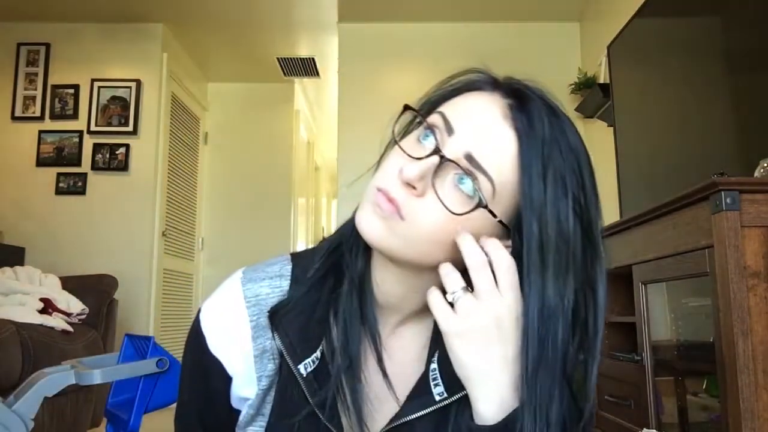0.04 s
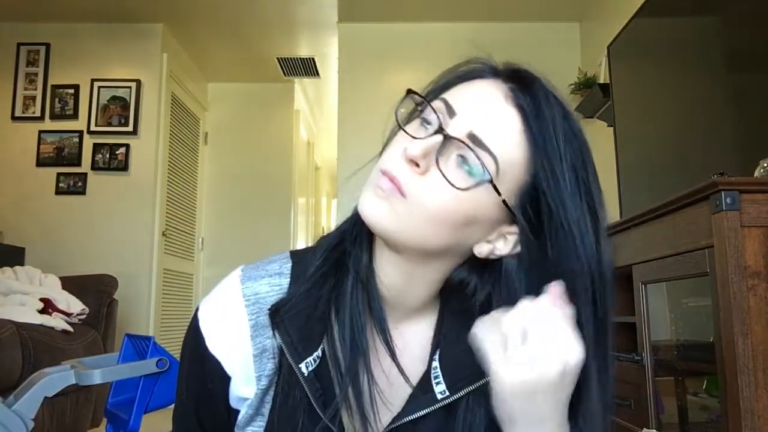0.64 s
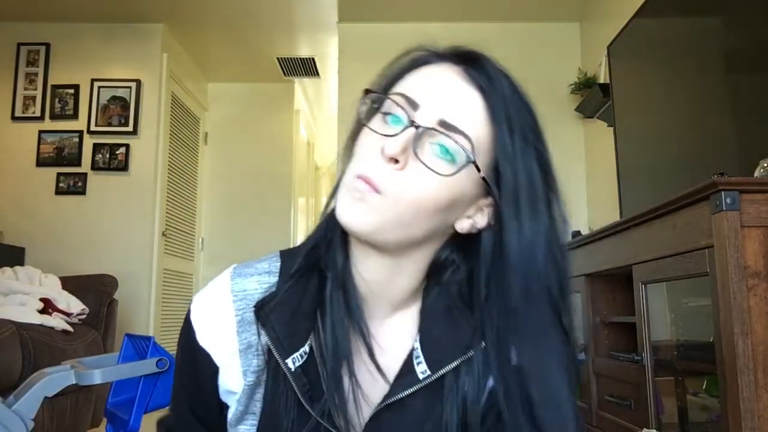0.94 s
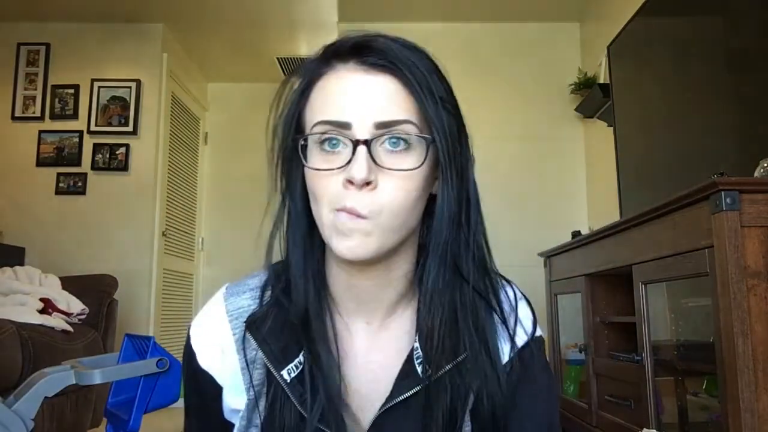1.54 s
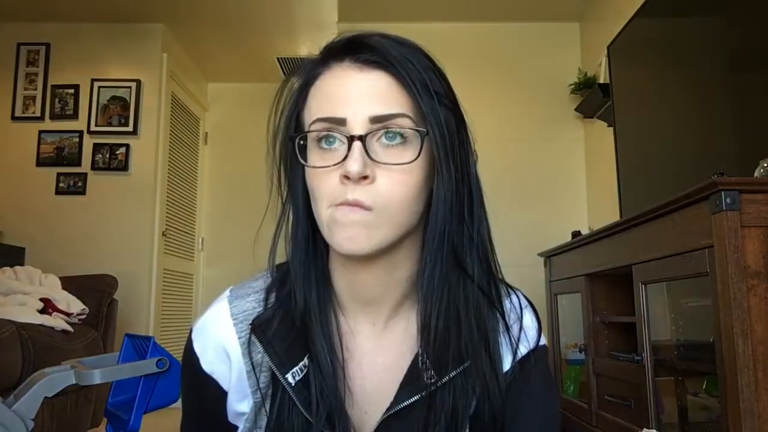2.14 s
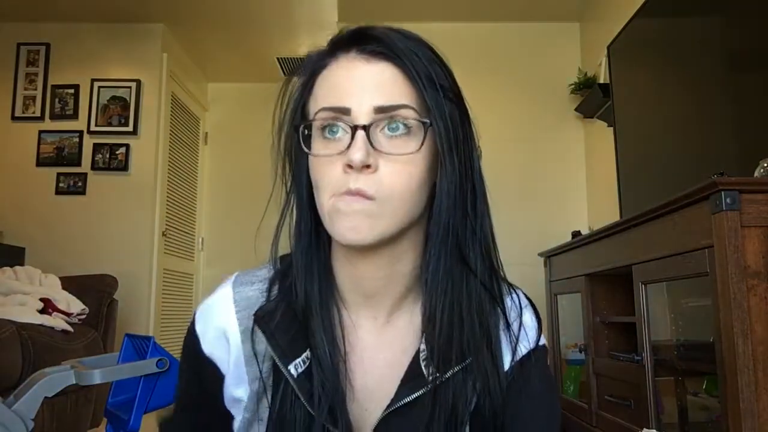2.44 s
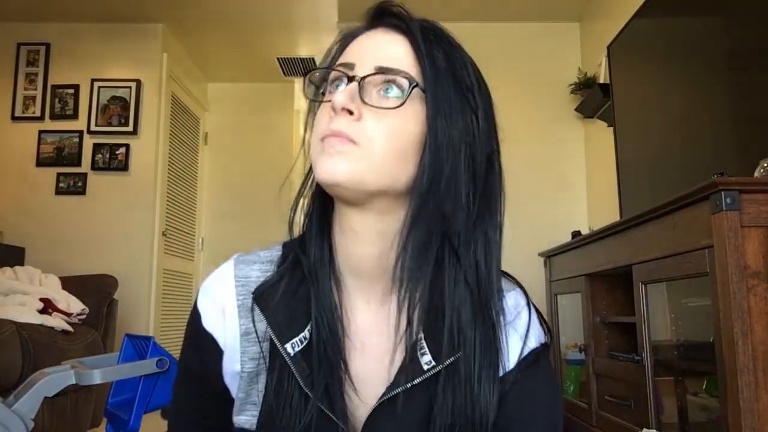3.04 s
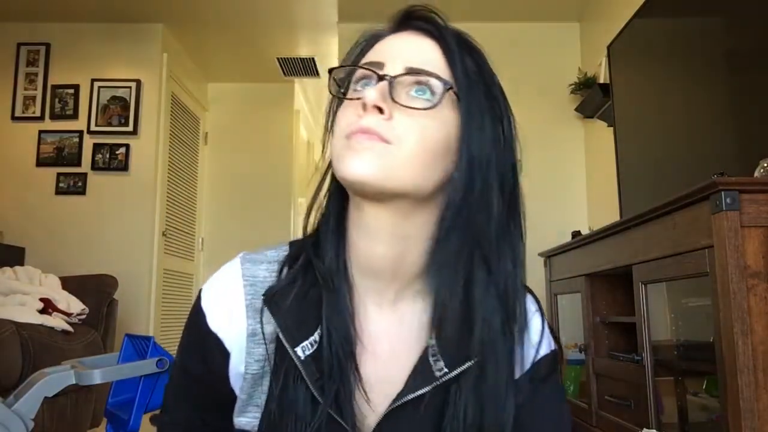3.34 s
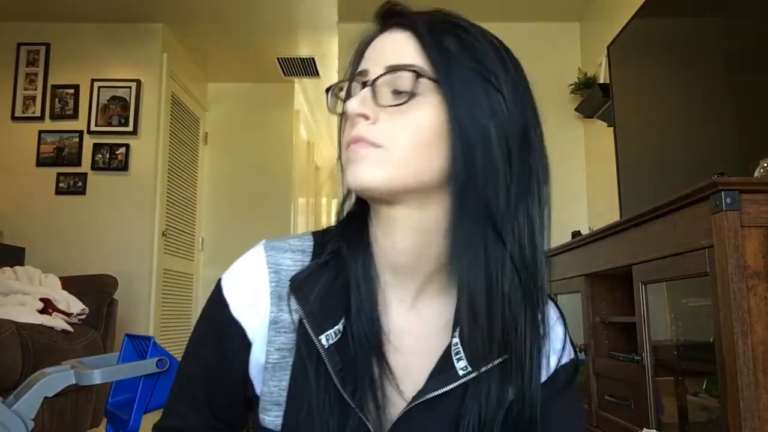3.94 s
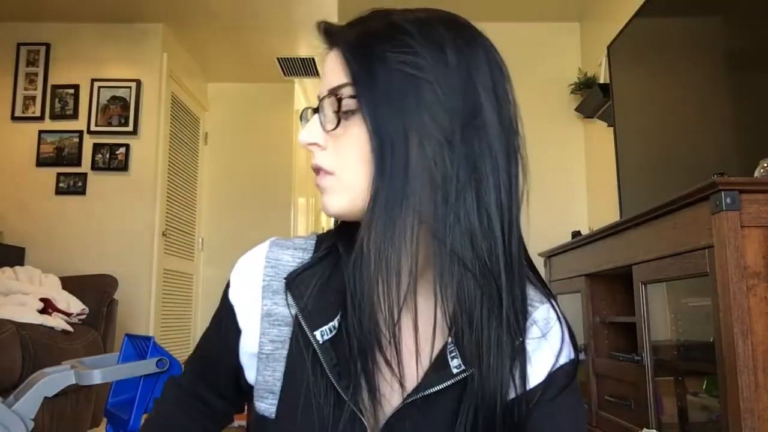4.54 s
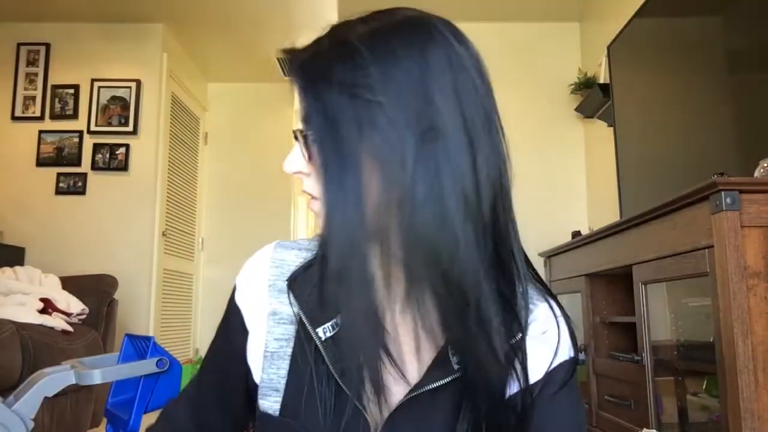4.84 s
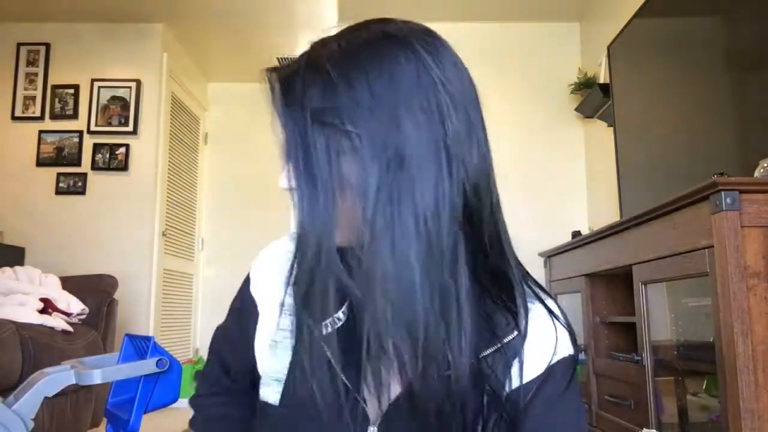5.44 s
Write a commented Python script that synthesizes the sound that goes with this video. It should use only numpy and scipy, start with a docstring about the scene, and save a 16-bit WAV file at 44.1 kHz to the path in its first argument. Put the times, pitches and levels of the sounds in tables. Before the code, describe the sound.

From the start, jets passing over a house fill a living room with a low, muffled roar. It booms and wavers, with brief hollow swells and a slightly raspier edge at the opening and again from about 1.8 to 3 seconds. Close to the microphone, clothes and hair brush very softly from around 1 second, and a cluster of faint, crisp ticks crackles at 1.2 to 1.3 seconds. A few barely audible brushes follow under the rumble. From about 3.7 seconds the roar grows quieter and duller as the jets draw away, though the deep rumble carries on. A second, longer cluster of small ticks and soft rustling runs from 3.9 to 4.4 seconds, with one more faint tick at 4.7. At about 5.3 seconds all sound cuts off abruptly.

```python
"""Jets passing over a living room

Jets pass over a house and draw away. Their exhaust roar, dulled by the walls, booms at the pitches the
room favours and swells and fades with the churning air. Close by, someone moves: clothes brush, and
faint ticks crackle, mostly in two clusters. The sound stops dead when the recorder is switched off."""
import sys
import numpy as np
from scipy import signal
from scipy.fft import rfft, irfft
from scipy.io import wavfile
from scipy.ndimage import uniform_filter1d

SR = 44100
rng = np.random.default_rng(int(sys.argv[2]) if len(sys.argv) > 2 else 0)


def wav_out(sig):
    """Save sig, one row per channel (or a flat mono array), as 16-bit PCM at SR to the path in sys.argv[1]."""
    wavfile.write(sys.argv[1], SR, np.round(np.clip(np.atleast_2d(sig).T, -1, 1) * 32767).astype(np.int16))


N = 247160
TIME = np.arange(N) / SR
FREQ = np.maximum(np.fft.rfftfreq(N, 1 / SR), 1)

# pitches at which the room and window panes ring: (pitch [Hz], width [Hz], lift [dB])
ROOM_MODES = [(85.7, 9, 15.5), (133.4, 9.2, 3.5), (155, 11, 10), (254.7, 7.4, 9.5), (281.9, 4.4, 8.5),
              (312.6, 13, 6.5), (346.8, 7.1, 9), (456.7, 12, 6.5), (609.6, 30, 4), (804, 42, 5.5),
              (1006, 29, 2.5), (1077, 120, 3.5), (1190, 11, 2), (1367, 50, 6)]
# pitches that cancel out where the microphone stands: (pitch [Hz], width [Hz], dip [dB])
ROOM_NODES = [(108, 14, -3.5), (177, 35, -6), (330, 24, -5.5), (497, 21, -5.5), (863, 110, -5.5)]
# the tone of a tick's snap: (pitch [Hz], relative level [dB])
SNAP = [(500, -8), (1500, 9.5), (2500, 3.5), (3700, -0.5), (5700, -1.5), (7500, -7.5), (9300, -7.5),
        (11600, -10), (15000, -19.5)]


def undb(db):
    """Turn decibels into a number to multiply by (a gain)."""
    return 10 ** (np.asarray(db) / 20)


def curve(table):
    """Join (time, level) points with straight lines, giving one level per sample."""
    times, levels = np.transpose(table)
    return np.interp(TIME, times, levels)


def colour(points, freq=FREQ):
    """Join (pitch, level) points into a gain for each frequency."""
    hz, db = np.transpose(points)
    return undb(np.interp(np.log(freq), np.log(hz), db))


def resonances(table):
    """Turn (pitch, width, height) peaks and dips into a gain for each frequency."""
    return undb(sum(db / (1 + (2 * (FREQ - hz) / width) ** 2) for hz, width, db in table))


def noise(gain):
    """Noise shaped by a gain for each frequency, scaled to an average strength (rms) of 1."""
    shaped = irfft(rfft(rng.standard_normal(N)) * gain, N)
    return shaped / np.sqrt(np.mean(shaped ** 2))


def walk(rate):
    """A smooth random wobble of typical size 1, up to about `rate` swings a second."""
    return noise(np.exp(-(FREQ / rate) ** 2))


def steady(x, span_s):
    """Even out the slow swells of a noise, leaving its fast grain."""
    local_power = uniform_filter1d(x ** 2, max(int(span_s * SR), 2))
    return x / np.sqrt(local_power + 1e-9)


def swell(peak_s, rise_s, fall_s):
    """A smooth bump of height 1 that tops out at peak_s."""
    return np.exp(-((TIME - peak_s) / np.where(TIME < peak_s, rise_s, fall_s)) ** 2)


def jet_band_levels(recede_s=3.82, rasp_sink_db_per_s=3.5, rush_sink_db_per_s=0.47):
    """Levels in dB of the jets' eight bands, low to high; the treble sinks with distance."""
    # the deepest rumble: (time [s], level [dB])
    rumble = [(0, -44.5), (.22, -37), (.55, -43.5), (1.35, -47), (1.95, -42.5), (2.12, -39), (2.75, -38.5),
              (3.3, -47), (4.0, -38), (4.65, -40.5), (5.33, -44.5)]
    # the boom around the room's lowest ringing pitch: (time [s], level [dB])
    boom = [(0, -28.5), (.24, -25.5), (.38, -32), (.6, -35.5), (.81, -26.5), (.95, -36.5), (1.5, -38),
            (1.85, -27.5), (2.25, -33.5), (2.53, -24.5), (2.63, -37), (2.92, -38.5), (3.12, -32),
            (3.5, -27), (3.75, -32.5), (3.86, -28), (4.0, -37), (4.42, -41), (4.85, -46.5), (5.26, -33)]
    # the drone an octave above it: (time [s], level [dB])
    drone = [(0, -29), (.07, -25.5), (.35, -38), (.57, -30), (.8, -40.5), (1.08, -31), (1.2, -35),
             (1.42, -29), (1.7, -27.5), (1.93, -25.5), (2.03, -32.5), (2.2, -30), (2.9, -32), (3.35, -33.5),
             (3.56, -28.5), (3.78, -35), (4.16, -41), (4.3, -30.5), (4.5, -34), (4.73, -27.5), (4.84, -33),
             (4.98, -26), (5.13, -38.5), (5.33, -31)]
    # the low roar, which thins out and fills in on its own: (time [s], level [dB])
    low_roar = [(0, -56), (.2, -49), (.42, -32.5), (1.0, -42.5), (1.4, -45.5), (1.7, -31.5), (2.05, -34.5),
                (3.45, -36.5), (3.78, -43), (4.25, -43.5), (4.7, -40.5), (4.97, -50.5), (5.33, -41)]
    # the exhaust roar indoors, which the top four bands follow: (time [s], level [dB])
    roar = [(0, -26), (.15, -29), (.35, -32.5), (.6, -30.5), (1.0, -34), (1.35, -30.5), (1.95, -29.5),
            (2.15, -35.5), (2.5, -28), (2.85, -29.5), (3.1, -31), (3.42, -30), (3.62, -34), (4.42, -42),
            (4.62, -42), (5.05, -39.5), (5.33, -39.5)]
    # surges of rasp through the churning air: (time [s], lift [dB], fall time [s])
    surges = [(.03, 3, 0.52), (1.82, 4, 0.33), (2.618, 3.5, 0.089), (2.82, 2.5, 0.1)]
    roar_db, usual_db = curve(roar), -26
    excess_db = roar_db - usual_db
    surge_db = sum(db * swell(s, rise_s=0.02, fall_s=fall_s) for s, db, fall_s in surges)
    harshness_db = surge_db - rasp_sink_db_per_s * np.maximum(TIME - recede_s, 0)
    middle = roar_db - 1.9  # this band's part of the whole roar
    upper = -36 + 0.48 * excess_db + harshness_db / 2
    rasp = -40 + 0.22 * excess_db + harshness_db
    # the air takes the highest part away first, right from the start
    rush = -54.5 + 0.25 * excess_db + surge_db / 2 - rush_sink_db_per_s * TIME
    return [curve(rumble), curve(boom), curve(drone), curve(low_roar), middle, upper, rasp, rush]


def ground_echo(x, share=0.43, lag_s=0.009, drift_s=0.001777, drift_rate=1.598):
    """Add a bounce off the ground; its delay wanders, so narrow swells drift through the roar."""
    position = (TIME - lag_s - drift_s * walk(drift_rate)) * SR
    return x + share * np.interp(position % N, np.arange(N), x)


def jets(top_flutter_db=0.8, flutter_rate=14):
    """Exhaust noise booms in the room; churning air on the way makes its upper parts flutter."""
    # borders between rumble, boom, drone, low, middle and upper roar, rasp and rush: (pitch [Hz])
    edges_hz = [66, 108, 176, 240, 400, 720, 1600]
    # exhaust noise after air, roof and windows: (pitch [Hz], relative level [dB])
    through_walls = [(25, -45.5), (45, -15), (68, -10), (130, -2), (200, -6), (310, -12), (500, -13.5),
                     (800, -16.5), (1200, -25.5), (1600, -31), (2100, -42.5), (2850, -51), (3400, -70.5),
                     (8000, -104)]
    indoor_tone = colour(through_walls) * resonances(ROOM_MODES + ROOM_NODES)
    below_edge = [1 / (1 + (FREQ / hz) ** 20) for hz in edges_hz]
    # each band takes what lies between two neighbouring borders
    shares = np.abs(np.diff([np.zeros_like(FREQ), *below_edge, np.ones_like(FREQ)], axis=0))
    gust_db = 0.18 * walk(rate=23)
    out = 0
    for k, (share, level_db) in enumerate(zip(shares, jet_band_levels())):
        band = noise(indoor_tone * np.sqrt(share))
        if k > 3:  # only the four upper bands get the drifting ground echo
            band = ground_echo(band)
        band = steady(band, span_s=0.13)
        # swirls of air scatter high pitches more than low ones
        flutter_db = k / len(edges_hz) * top_flutter_db * walk(flutter_rate)
        out = out + band * undb(level_db + flutter_db + gust_db)
    return out


def howls():
    """The roar turns hollow for a moment as a narrow band of exhaust noise rings in the room."""
    # hollow swells: (middle [s], length [s], pitch [Hz], width [Hz], peak level [dB])
    hollow_swells = [(0.1, 0.32, 334, 47, -29.5), (.19, 0.2, 348, 14, -37.5), (0.554, 0.1, 258, 12, -28.5),
                     (1.187, 0.34, 505, 70, -38), (1.267, 0.08, 790, 80, -37), (1.382, 0.28, 265, 25, -33),
                     (1.584, 0.069, 432, 45, -33), (1.917, 0.076, 464, 60, -33.5),
                     (1.997, 0.67, 1080, 140, -43), (2.637, 0.19, 860, 110, -38),
                     (2.79, 0.22, 283, 43, -30.5), (2.972, 0.09, 360, 18, -28.5),
                     (3.033, 0.072, 419, 24, -36), (3.168, 0.15, 833, 64, -42),
                     (3.186, .16, 306, 18, -31.5), (3.305, 0.093, 1720, 110, -54),
                     (3.362, 0.17, 227, 25, -34.5), (4.618, 0.23, 245, 26, -38),
                     (4.715, .14, 332, 45, -38.5), (5.037, 0.043, 505, 60, -40)]
    room_tone = resonances(ROOM_MODES + ROOM_NODES)
    out = 0
    for s, length, hz, width, db in hollow_swells:
        focus = np.exp(-((FREQ - hz) / width) ** 2)
        band = steady(noise(room_tone * focus), span_s=0.031)
        out = out + band * undb(db) * swell(s, length / 2, length / 2)
    return out


def tick(hz, tilt_db, fade_s, ring_db, ring_sharpness=6, pivot_hz=5500):
    """A short snap that rings at one pitch, scaled so its loudest millisecond has strength 1."""
    t = np.arange(4096) / SR
    freq = np.maximum(np.fft.rfftfreq(len(t), 1 / SR), 1)
    burst = rfft(rng.standard_normal(len(t)) * undb(-60 * t / fade_s))
    # a snap stirs all pitches about equally
    burst = burst / np.sqrt(uniform_filter1d(np.abs(burst) ** 2, size=110))
    ring = 1 + undb(ring_db) / (1 + 1j * ring_sharpness * (freq / hz - hz / freq))
    tilt = undb(tilt_db * np.log2(np.maximum(freq, 800) / pivot_hz))
    wave = irfft(burst * colour(SNAP, freq) * ring * tilt)[:len(t) // 2]
    return wave / np.sqrt(uniform_filter1d(wave ** 2, size=44).max())


def ticks(gain_db=-3, usual_fade_s=0.0098, usual_db=-40, doubling_db=21):
    """Faint ticks close by, each with its own size, pitch and sharpness; stronger ones last longer."""
    # ticks: (time [s], level before gain_db [dB], pitch [Hz], brightness [dB per octave], ring [dB])
    snaps = [(.22, -60, 5400, -3, 28), (0.897, -52.5, 7600, 1, 24), (1.174, -41, 3100, -2, 6),
             (1.177, -35.5, 3440, -3, 9), (1.1855, -38.5, 4300, 0.5, 0), (1.191, -32.5, 4340, -2, 4),
             (1.2327, -44, 3900, -5, 6), (1.2724, -46, 6000, -2, 6), (1.2827, -38.5, 3080, -4, 6),
             (1.287, -39.5, 6650, -2.5, 11.5), (1.3336, -44.5, 5840, -3.5, 4), (3.901, -56, 3600, -4, 14),
             (3.9543, -43, 3730, 0.5, 6), (4.006, -36.5, 6200, 3, 2.5), (4.0645, -47, 6000, -3, 6),
             (4.0696, -43, 3400, -1, 12), (4.0850, -36, 3340, 1, 3), (4.1298, -40, 7200, 0, 0),
             (4.1404, -43, 5000, -3, 3), (4.215, -40.5, 7550, 2.5, 4), (4.2690, -45, 4100, -3, 14),
             (4.276, -47, 4000, -5, 11.5), (4.3312, -41, 5400, -1, -3), (4.3393, -38.5, 5970, 4.5, 2),
             (4.348, -36, 3000, -0.5, -7), (4.4438, -47.5, 6100, -2.5, 1), (4.735, -50, 3100, -10, 13)]
    out = np.zeros(N)
    for s, db, hz, tilt_db, ring_db in snaps:
        fade_s = usual_fade_s * 2 ** ((db - usual_db) / doubling_db)
        wave = tick(hz, tilt_db, fade_s, ring_db)
        start = int(s * SR)
        out[start:start + len(wave)] += undb(db + gain_db) * wave
    return out


def room(x, wash_db=-7.5, fade_s=0.17, echo_s=0.0098, echo_db=-13):
    """A near surface throws back one echo; the furnished room scatters each tick into a short wash."""
    echo = undb(echo_db) * np.roll(x, int(echo_s * SR))
    decay = undb(-60 * TIME[:SR] / fade_s) ** 2
    lingering_energy = np.maximum(signal.fftconvolve(x ** 2, decay / decay.sum())[:N], 0)
    treble_cut = 1 / (1 + (FREQ / 10000) ** 2)
    bass_cut = np.minimum(FREQ / 3500, 1)
    wash = noise(colour(SNAP) * treble_cut * bass_cut)
    return x + echo + undb(wash_db) * wash * np.sqrt(lingering_energy)


def tick_ringing(x):
    """Every tick rings briefly at the same few high pitches."""
    # the ringing tones: (pitch [Hz], width [Hz], level against the snap [dB])
    tones = [(3005, 50, 0), (3220, 50, 2.5), (3700, 41, -1), (4085, 40, -0.5), (4500, 100, -5)]
    rings = sum(undb(db) / (1 + 1j * hz / width * (FREQ / hz - hz / FREQ)) for hz, width, db in tones)
    return irfft(rfft(x) * (1 + rings), N)


def clothes(width_per_pitch=0.12):
    """Fibres catch and let go: each stroke is a soft, grainy brushing that swells and dies away."""
    # the tone of rubbing cloth: (pitch [Hz], relative level [dB])
    cloth = [(1000, -4), (3200, 2), (6500, -4.5), (10000, -9), (15000, -11.5)]
    # clothes and hair brush as the arm drops and the head lifts and turns:
    # (middle [s], length [s], peak level [dB], pitch [Hz], lift at that pitch [dB])
    strokes = [(1.017, 0.28, -69.5, 6000, 6), (1.292, 0.37, -72, 4020, 2), (1.691, .2, -70, 3600, -6),
               (2.565, .05, -70.5, 5580, 10), (2.806, .16, -73.5, 4000, 6), (3.762, 0.38, -73, 6160, 7.5),
               (4.105, 0.2, -64, 4400, 5), (4.315, 0.3, -66, 5500, 2), (5.3, 0.23, -71.5, 6000, 3)]
    grain_db = 1.2 * walk(rate=200)
    out = 0
    for s, length, db, hz, lift_db in strokes:
        focus = undb(lift_db / (1 + ((FREQ / hz - 1) / width_per_pitch) ** 2))
        brushing = noise(colour(cloth) * focus)
        out = out + brushing * undb(db) * swell(s, length / 2, length / 2)
    return out * undb(grain_db)


def scene():
    """Jets outside and small movements inside, mixed into one channel."""
    return (jets() + tick_ringing(room(ticks())) + clothes() + howls())[None]


def record(dry, hiss_db=-67.5, stop_s=5.3366, top_hz=15700):
    """A faint hiss of the room fills the background and the microphone weakens two pitches; the recorder stops
    dead and cuts the top treble."""
    # the tone of the room's faint hiss: (pitch [Hz], relative level [dB])
    hiss_tone = [(1000, 8), (4200, -0.5), (5700, -4), (7500, -7.5), (9500, -8), (11500, -11),
                 (15500, -12.5)]
    # narrow ranges the microphone picks up less well: (pitch [Hz], width [Hz], dip [dB])
    mic_dips = [(4840, 380, -5), (10370, 550, -5.5)]
    sound = dry + undb(hiss_db) * noise(colour(hiss_tone))
    sound = irfft(rfft(sound) * resonances(mic_dips), N)
    treble_cut = signal.ellip(10, 0.1, 80, top_hz, fs=SR, output="sos")
    return signal.sosfilt(treble_cut, sound * (TIME < stop_s))


dry = scene()
out = record(dry)
wav_out(out)
```